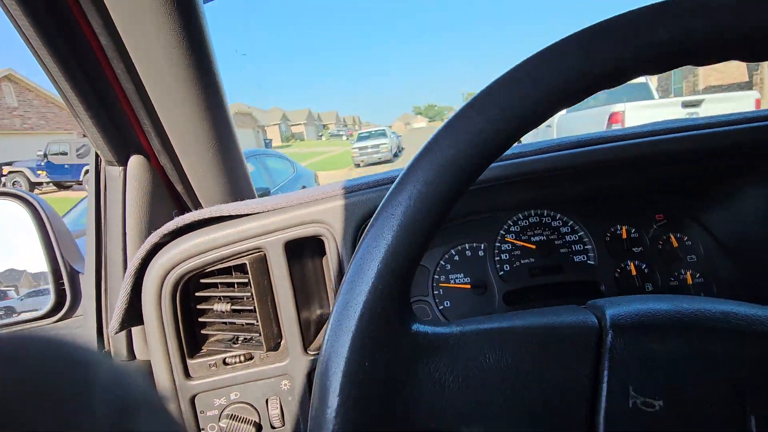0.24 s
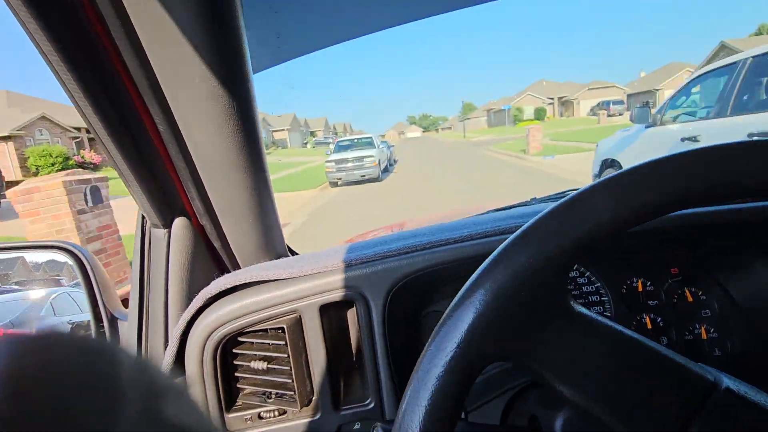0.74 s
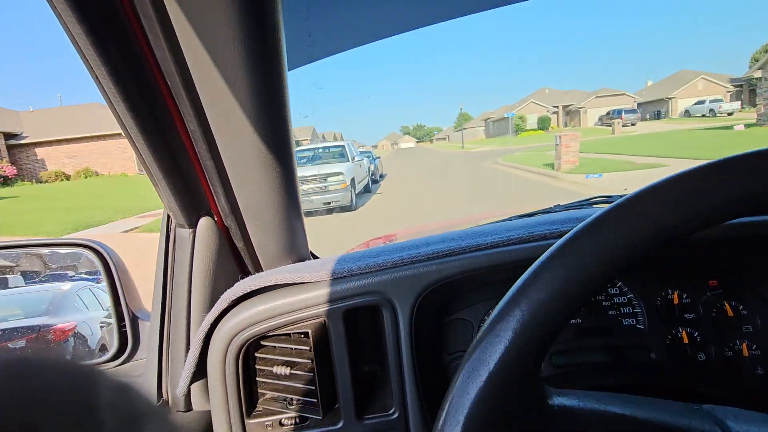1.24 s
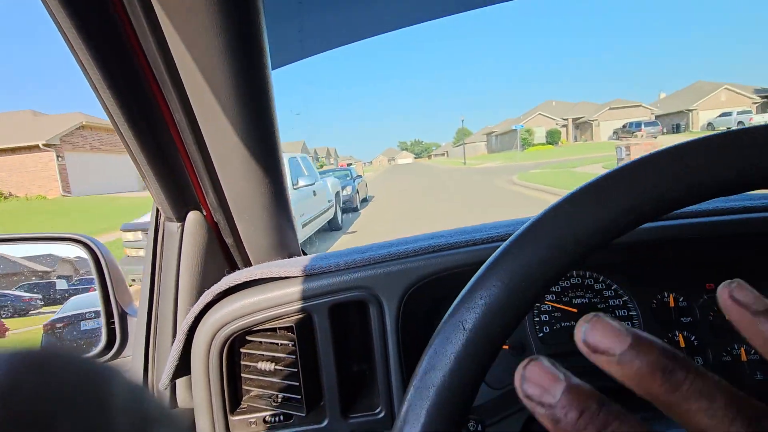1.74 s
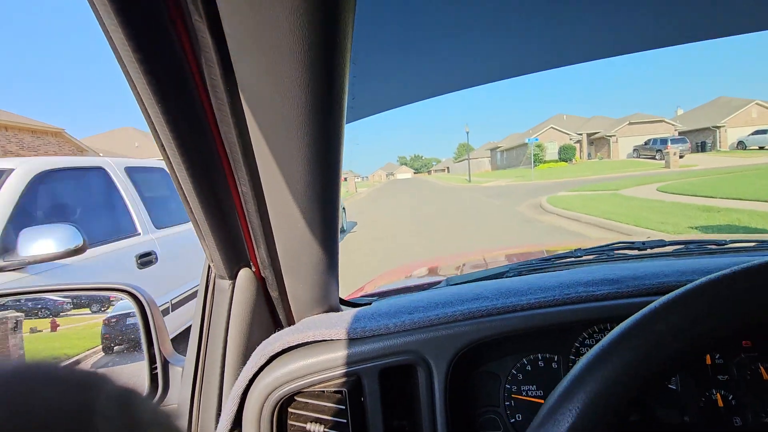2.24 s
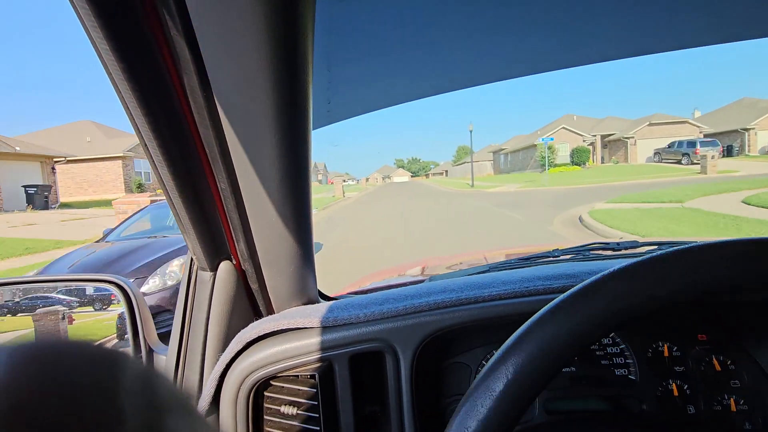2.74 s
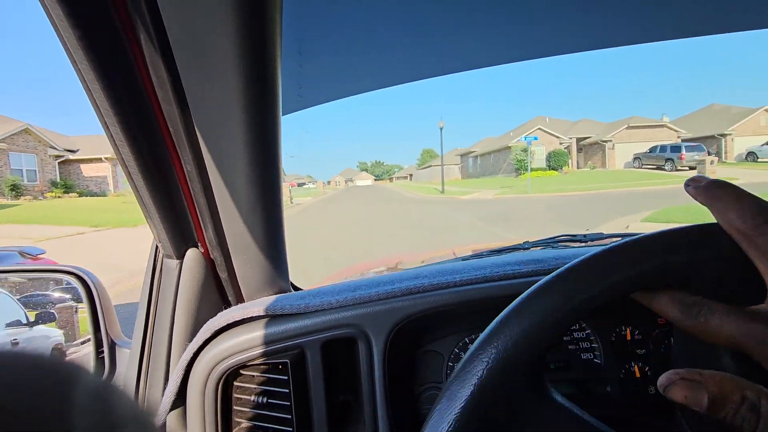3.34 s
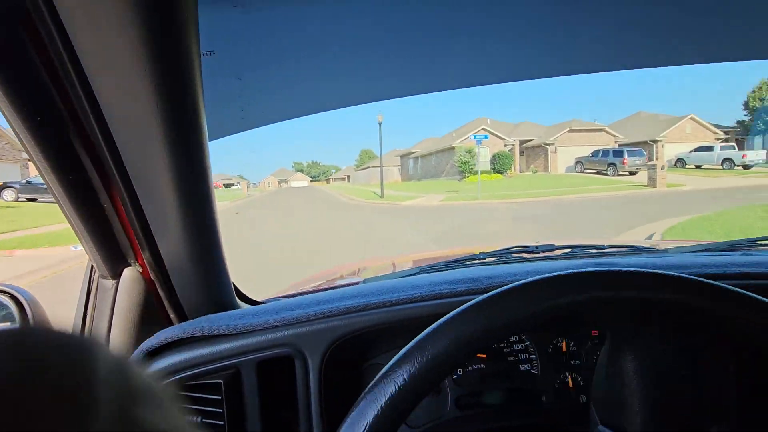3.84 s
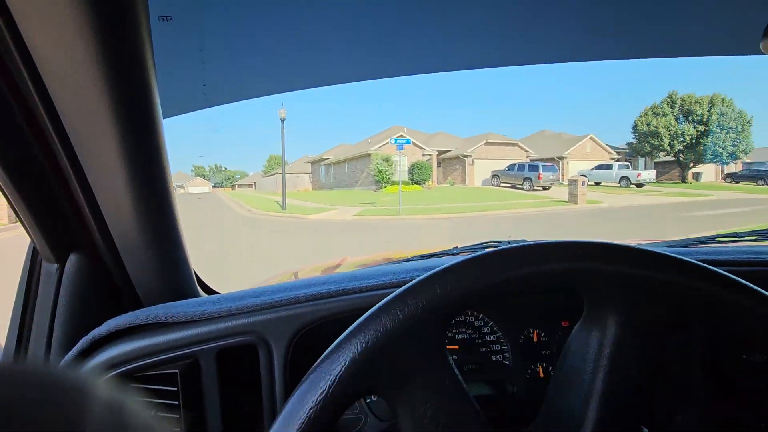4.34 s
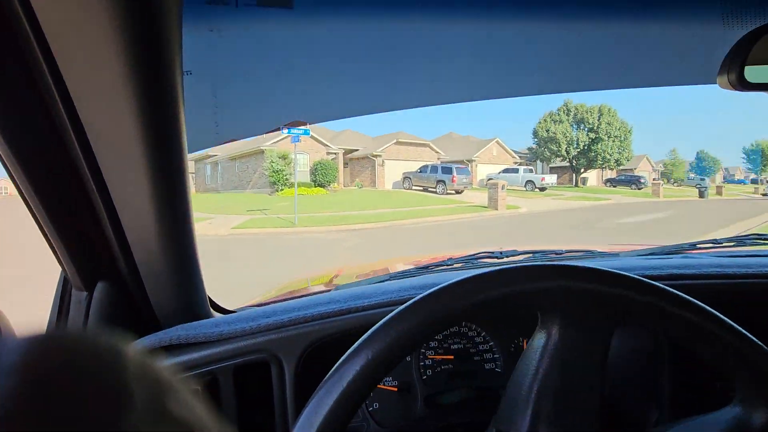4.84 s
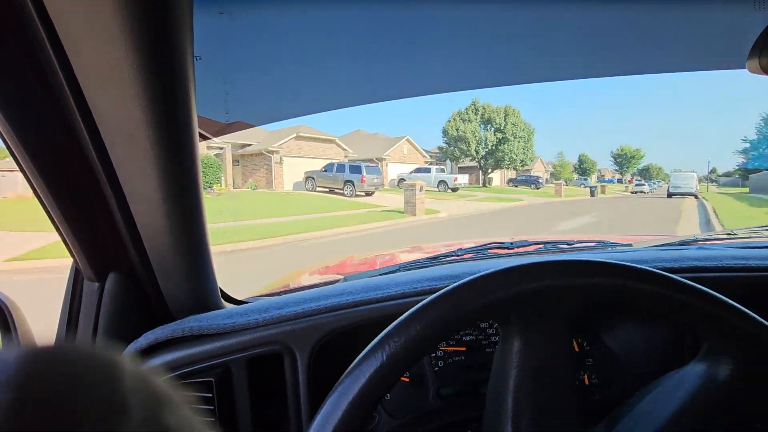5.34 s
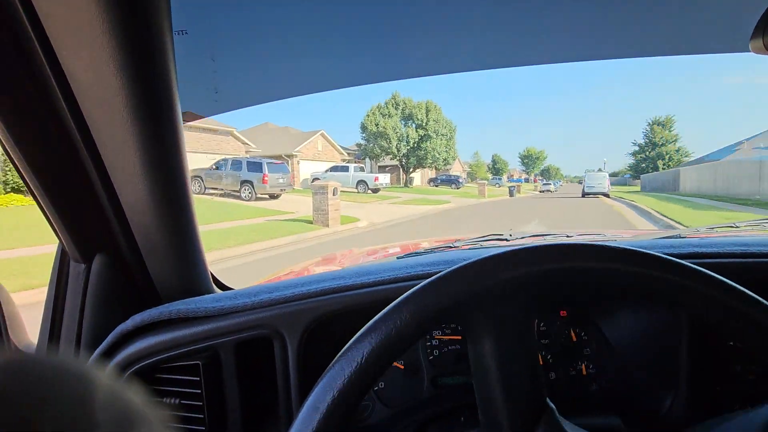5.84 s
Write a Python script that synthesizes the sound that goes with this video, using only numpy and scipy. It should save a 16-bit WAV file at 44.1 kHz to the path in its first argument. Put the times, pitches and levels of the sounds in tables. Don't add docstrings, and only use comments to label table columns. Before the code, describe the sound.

From inside a truck cab, a rough eight-cylinder engine drones and hisses past parked cars, trim rattles over bumps, then the revs climb.

```python
import sys
import numpy as np
from scipy import signal
from scipy.io import wavfile
from scipy.ndimage import uniform_filter1d

SR = 44100
rng = np.random.default_rng(int(sys.argv[2]) if len(sys.argv) > 2 else 0)


def volts_from_db(level):
    exponent = np.asarray(level, float) / 20
    return 10 ** exponent


def log_audio(samples):
    frames = np.atleast_2d(samples).T
    limited = np.clip(frames, -1, 1)
    pcm = np.round(limited * 32767).astype(np.int16)
    wavfile.write(sys.argv[1], SR, pcm)


N = 269010
T = np.arange(N) / SR

# (time [s], firings per second [Hz])
FIRING_SPEED = [(0.0, 74.07), (0.28, 75.24), (0.72, 70.56), (1.2, 76.39), (1.6, 76.86), (1.85, 74.8),
                (2.1, 77.22), (2.73, 84.55), (3.15, 79.68), (3.45, 75.13), (3.65, 77.47), (4.2, 85.56),
                (4.45, 85.01), (4.95, 86.43), (5.1, 91.12), (5.63, 115.68), (5.83, 121.11), (6.1, 120.61)]


def evened(x):
    return x / np.sqrt(np.mean(x ** 2) + 1e-20)


def read(points, hz):
    f, value = np.transpose(points)
    return np.interp(np.log(hz + 1), np.log(f + 1), value)


def over_time(rows):
    s, value = np.transpose(rows)
    return np.interp(T, s, value)


def sides(left_minus_right_db):
    return volts_from_db(np.array([[.5], [-.5]]) * left_minus_right_db)


def resonate(x, hz, width_hz):
    turn = np.exp(2j * np.pi * np.cumsum(hz * np.ones(x.shape[-1])) / SR)
    r = np.exp(-np.pi * width_hz / SR)
    smooth = signal.lfilter([1 - r], [1, -r], x / turn)
    return 2 * (turn * smooth).real


def wander(rate_hz):
    f = np.geomspace(rate_hz / 8, rate_hz, 16)[:, None]
    coarse = np.sin(2 * np.pi * (f * T[::64] + rng.random((16, 1)))).sum(0)
    return np.interp(T, T[::64], evened(coarse))


def noise_pair(colour, lead_s, patchy_db):
    # (frequency [Hz], likeness [0-1])
    likeness = [(60, 1), (130, .99), (290, .85), (640, .72), (1400, .7), (3100, .45), (6800, .25),
                (15000, .12)]
    # (frequency [Hz], left minus right [dB])
    side_lean = [(60, -3.5), (150, 7), (300, 1), (600, 3), (1000, 2), (1350, 7), (1800, 5.5), (3000, 7.5),
                 (4500, 10), (7500, 11), (9500, 5.5), (11500, -3), (13500, 26.5), (15500, -15.5)]
    frames, hz = N // 256 + 5, np.fft.rfftfreq(1024, 1 / SR)
    a, b, c, d, patches = rng.standard_normal((frames, 513, 5)).T
    patches = uniform_filter1d(patches, size=10, axis=0)
    patches = evened(uniform_filter1d(patches, size=8, axis=1))
    same = np.clip(read(likeness, hz), 0, 1)[:, None]
    late = np.exp(-2j * np.pi * hz * lead_s)[:, None]
    left, other = a + 1j * b, c + 1j * d
    right = late * same * left + np.sqrt(1 - same ** 2) * other
    lean = volts_from_db(np.array([.5, -.5])[:, None, None] * read(side_lean, hz)[:, None])
    z = np.array([left, right]) * lean * volts_from_db(read(colour, hz)[:, None] + patchy_db * patches)
    pair = signal.istft(z, nperseg=1024, noverlap=768)[1][:, :N]
    return pair / np.sqrt(np.mean(pair.mean(0) ** 2))


def cycles():
    already_turned = .045
    return already_turned + np.cumsum(over_time(FIRING_SPEED)) / 8 / SR


def drone():
    # (time [s], level [dB])
    load = [(0.0, -27), (0.36, -25), (1.1, -28), (1.4, -27), (1.62, -29.5), (1.8, -27), (3.6, -27),
            (4.98, -28), (5.2, -30), (5.4, -28.5), (5.56, -25), (5.95, -22), (6.1, -23)]
    # (order [per cycle], level [dB])
    orders = [(3, -9), (4, -17), (5, -5), (6, -18), (7, -20), (8, 0), (9, -20), (10, -14), (11, -7.5),
              (12, -21), (13, -18.5), (14, -20), (15, -22), (16, -8.5), (18, -24), (19, -20), (21, -22.5),
              (23, -24), (24, -25), (26, -24), (27, -25), (29, -25), (33, -27)]
    # (frequency [Hz], level [dB])
    pipe = [(20, -12), (48, 0), (121, 0), (126, -1), (136, 4), (143, -.5), (152, -1), (161, -4), (169, 0),
            (180, -7), (188, 2), (196, 11), (204, 7), (212, 0), (228, -7), (320, -6)]
    turns, firing_hz = cycles()[::8], over_time(FIRING_SPEED)[::8]
    out = 0
    for k, db in orders:
        size_db = db + read(pipe, k * firing_hz / 8) + .9 * wander(6.0)[::8]
        if k not in (8, 10, 13):
            size_db -= .6 * np.clip(firing_hz - 86, 0, 18)
        lag = .006 * k * wander(5.0)[::8]
        lag += .962 * k ** 2 + 4.19 * k - .96
        out = out + volts_from_db(size_db) * np.cos(2 * np.pi * k * turns - lag)
    out = volts_from_db(over_time(load)[::8] + 2.0) * out
    out = signal.resample_poly(out, 8, 1, padtype="edge")[:N]
    return out * sides(1.2)


def bumps():
    # (time [s], peak level [dB], frequency [Hz], half length [s])
    road_bumps = [(0.094, -23, 27.4, 0.17), (0.301, -14, 40.5, 0.036), (0.428, -17.5, 27, 0.074),
                  (0.572, -14.5, 32.2, 0.018), (0.716, -13.5, 27, 0.025), (0.806, -18.5, 31.6, 0.025),
                  (1.027, -24.5, 24.5, 0.1), (1.269, -18.5, 40.4, 0.014), (1.414, -27.5, 46.7, 0.045),
                  (1.495, -18.5, 33.8, 0.022), (1.687, -28.5, 29.6, 0.031), (1.95, -27.5, 27.3, 0.063),
                  (2.293, -41, 22.5, 0.077), (2.54, -41, 24.3, 0.034), (2.837, -18.5, 31.6, 0.035),
                  (2.97, -21.5, 24, 0.078), (3.209, -26, 29.5, 0.064), (3.399, -13, 34.3, 0.038),
                  (3.543, -16, 24, 0.054), (3.751, -27, 38.7, 0.093), (3.922, -19, 30, 0.052),
                  (4.017, -13.5, 28.1, 0.046), (4.277, -21.5, 24, 0.071), (4.55, -24, 26.4, 0.051),
                  (4.675, -22, 32.6, 0.059), (4.835, -14.5, 38, 0.027), (4.958, -18, 28.5, 0.03),
                  (5.171, -23, 29.4, 0.087), (5.358, -16.5, 32.5, 0.028), (5.639, -23, 27.4, 0.044)]
    swing, size = np.zeros(N), np.zeros(N)
    for (s, db, hz, half_s), turn in zip(road_bumps, rng.random(len(road_bumps))):
        near = slice(max(round((s - .4) * SR), 0), round((s + .4) * SR))
        since = T[near] - s
        shape = np.sqrt(2) * volts_from_db(db) * np.exp(-(since / half_s) ** 2 / 2)
        swing[near] += shape * np.cos(2 * np.pi * (hz * since + turn))
        size[near] += shape
    return swing, size


def boom(swing):
    # (frequency [Hz], width [Hz])
    cab_modes = [(27.5, 8), (38, 10)]
    mode_levels = [-30.5, -35.5]
    out = swing
    for db, (hz, width_hz) in zip(mode_levels, cab_modes):
        ringing = resonate(rng.standard_normal(N), hz, width_hz)
        ringing = resonate(ringing, hz, width_hz)
        out = out + volts_from_db(db) * evened(ringing)
    return np.array([out, np.roll(out, 18)])


def rumble(bump_size):
    # (frequency [Hz], level [dB])
    shake_colour = [(20, -21), (45, 10.5), (65, 0), (110, 6.5), (160, -2), (200, 2.5), (280, -1.3),
                    (320, -15), (420, -12), (540, -15), (800, -15), (1100, -20.5), (2500, -32), (6000, -47)]
    # (frequency [Hz], width [Hz], level [dB])
    panels = [
        (279, 20, -5.5),
        (550, 40, 1),
        (765, 70, -1),
    ]
    level_db = -34 + 0.34 * wander(1.7) + 2.5 * bump_size / bump_size.max()
    level_db += .8 * wander(16.0)
    level_db += 0.0521 * (over_time(FIRING_SPEED) - 80)
    shake = noise_pair(shake_colour, lead_s=0.00032, patchy_db=1.3)
    panel_sound = sum(volts_from_db(db) * resonate(shake, hz, width_hz) for hz, width_hz, db in panels)
    return volts_from_db(level_db) * (shake + panel_sound)


def street():
    # (time [s], roar level [dB], puffs level [dB], half length [s], left minus right [dB])
    parked_cars = [(0.108, -45.5, -46.5, 0.26, 6.5), (0.385, -61, -64, 0.16, 4), (0.673, -42, -43, 0.16, 8),
                   (0.83, -48, -61, 0.052, 7), (0.94, -50, -54, 0.27, 11), (1.172, -49, -52, 0.053, 8),
                   (1.295, -51.5, -65, 0.11, 6), (1.462, -56.5, -51, 0.055, 3),
                   (1.575, -55.5, -54, 0.08, 0), (2.25, -73, -50.5, 0.075, 8), (2.517, -44, -45, 0.19, 6.5),
                   (2.778, -44.5, -50, 0.31, 4), (3.14, -59, -54.5, 0.43, 9),
                   (3.484, -47, -46.5, 0.21, 6.5), (3.857, -53.5, -53, 0.2, 4), (4.17, -47, -66, 0.029, 0),
                   (4.76, -58, -64, 0.23, 5), (5.543, -65, -58, 0.61, 6.5)]
    open_roar_db, open_puffs_db, open_pan_db = -57.5, -63.5, 2
    t = T[::64]
    s, roar_db, puffs_db, half_s, pan_db = np.transpose(parked_cars)[:, :, None]
    near = 1 / (1 + ((t - s) / half_s) ** 2) ** 2
    revs_db = 0.09 * (over_time(FIRING_SPEED)[::64] - 80)
    back, spit = near * volts_from_db(2 * roar_db), near * volts_from_db(2 * puffs_db)
    clear = volts_from_db(2 * (open_puffs_db + revs_db))
    roar_power = back.sum(0) + volts_from_db(2 * (open_roar_db + revs_db))
    puffs_power = spit.sum(0) + clear
    pan = ((spit * pan_db).sum(0) + clear * open_pan_db) / puffs_power
    return [np.interp(T, t, v) for v in (10 * np.log10(roar_power), 10 * np.log10(puffs_power), pan)]


def roar():
    # (frequency [Hz], level per Hz [dB])
    wash_colour = [(180, -1), (300, -10.5), (318, -42), (341, 0), (545, -5), (836, -4), (910, -3.5),
                   (1050, -1), (1680, -9.5), (2080, -11.5), (3420, -18), (4170, -18), (9000, -30.5),
                   (11700, -24), (19800, -120)]
    # (time [s], warmth [dB])
    warmth = [(0, 2.5), (.62, 0), (.7, 3), (.8, 3), (1.4, 1), (1.9, -0.5), (3.5, -3), (4.5, -32),
              (6.1, -41)]
    # (frequency [Hz], width [Hz], level [dB])
    window_frame = [(1065, 41, -11), (1450, 39, -13), (2090, 67, -4.5), (2380, 35, -6.5)]
    turns = cycles()
    throb = 1 + 0.029 * np.cos(2 * np.pi * 8 * turns) + 0.034 * np.cos(2 * np.pi * 3 * turns)
    wash = noise_pair(wash_colour, lead_s=0.00046, patchy_db=1.0)
    warm = signal.lfilter(*signal.butter(2, [650, 1350], "band", fs=SR), wash)
    wash += (volts_from_db(over_time(warmth)) - 1) * warm
    wash += volts_from_db(3.0) * resonate(wash, 544.6, 30.0)
    wash += sum(volts_from_db(db) * resonate(wash, hz, width_hz) for hz, width_hz, db in window_frame)
    return volts_from_db(street()[0] + 3.0 + 0.24 * wander(7.7)) * throb * wash


def puffs():
    # (frequency [Hz], level per Hz [dB])
    hiss_colour = [(1470, -22), (2500, -2), (2640, -6), (3400, -8), (4150, -6), (4800, -5), (5380, -2),
                   (5990, -8), (6520, -9.5), (10300, -7), (11800, -2.5), (13700, -22), (14700, -15),
                   (15600, -11)]
    # (place in the cycle [0-1], strength [dB], fading time [s])
    leaks = [
        (.935, 0, .015),
        (.315, -1, .013),
        (.68, -6, .02),
    ]
    # (frequency [Hz], width [Hz], level [dB])
    small_parts = [(5100, 100, -26), (6460, 230, -28), (8300, 220, -35.5), (9200, 950, 2.5),
                   (11500, 59, -0.5), (12500, 390, -9)]
    _, level_db, pan_db = street()
    turns, cycle_hz = cycles(), over_time(FIRING_SPEED) / 8
    luck = rng.standard_normal((80, len(leaks), 1 + len(small_parts)))
    puff_power, part_levels = np.zeros(N), np.zeros((len(small_parts), N))
    for k, (place, db, fade_s) in enumerate(leaks):
        since_s = (turns - place + 0.034 * wander(4.3)) % 1 / cycle_hz
        draw = luck[np.floor(turns - place + .02).astype(int) + 1, k]
        puff = volts_from_db(db + 1.5 * draw[:, 0].clip(-2, 1.2))
        puff *= (1 - np.exp(-since_s / .0025)) * np.exp(-since_s / fade_s)
        puff_power += puff ** 2
        part_levels += puff * volts_from_db(3 * draw[:, 1:].T.clip(-2, 1.4)) * np.exp(-since_s / .03)
    hiss = noise_pair(hiss_colour, lead_s=0.000303, patchy_db=2.5)
    shake = rng.standard_normal(N)
    rung = 0
    for (hz, width_hz, db), part_level in zip(small_parts, part_levels):
        rung = rung + volts_from_db(db) * evened(resonate(shake, hz, width_hz)) * part_level
    steady_power = 0.083 * (cycle_hz / 9.07) ** 3
    out = hiss * np.sqrt(steady_power + puff_power)
    out += volts_from_db(-8.0) * rung * np.array([[1.3], [.4]])
    side = volts_from_db(np.array([[.3], [-.7]]) * (pan_db - 3.0))
    return volts_from_db(level_db + 5.0) * side * out


def short_rings(events, rise_s, fade_s, width_hz, pan_db, clean):
    out, t = np.zeros(N + 6000), np.arange(6000) / SR
    shape = (1 - np.exp(-t / rise_s)) * np.exp(-t / fade_s)
    for s, db, hz in events:
        rough = resonate(rng.standard_normal(6000), hz, width_hz)
        rough = evened(resonate(rough, hz, 3 * width_hz))
        tone = np.sin(2 * np.pi * hz * t)
        ring = ((1 - clean) * rough + clean * tone) * shape
        out[round(s * SR):][:6000] += volts_from_db(db) * ring / abs(ring).max()
    return out[:N] * sides(pan_db)


def chirps():
    # (time [s], peak level [dB], frequency [Hz])
    belt_slips = [(0.0295, -52, 5250), (0.0752, -44, 5300), (0.1745, -43, 5300), (0.385, -49, 5300),
                  (0.4, -55, 5380), (0.833, -50, 5100), (2.21, -48, 5170), (2.606, -45, 5320),
                  (2.7621, -52, 5250), (2.7621, -50, 6800), (3.782, -58, 5600), (2.915, -62, 10100)]
    return volts_from_db(-1.5) * short_rings(belt_slips, rise_s=.004, fade_s=.013, width_hz=90.0, pan_db=9.0, clean=.6)


def squeaks():
    # (time [s], peak level [dB], frequency [Hz])
    rubs = [(0.097, -39, 8540), (0.1361, -42.5, 11100), (0.5233, -37.5, 6500), (0.6094, -41, 8200),
            (0.635, -47, 7340), (0.6777, -35, 8200), (0.7465, -44, 6150), (0.9087, -44.5, 11000),
            (1.1303, -49.5, 8200), (2.4334, -41, 7300), (2.7644, -52, 11000), (2.8554, -56, 11600),
            (3.4225, -41, 9040)]
    return volts_from_db(-2) * short_rings(rubs, rise_s=.002, fade_s=.009, width_hz=200.0, pan_db=9.0, clean=.3)


def knocks():
    # (time [s], peak level [dB], frequency [Hz])
    body_hits = [(0.143, -37, 540), (0.246, -31, 510), (0.37, -32, 558), (0.505, -36, 540),
                 (0.566, -33, 508), (0.566, -38, 806), (0.566, -32, 666), (0.615, -30.5, 504),
                 (0.666, -39, 525), (0.715, -33, 550), (0.784, -33, 560), (0.836, -34, 500),
                 (0.9, -37, 540), (1.17, -33, 500), (1.25, -33, 505), (1.32, -37, 540), (1.55, -37, 550),
                 (2.285, -37, 586), (2.694, -31, 540), (3.11, -33, 540), (3.365, -31, 477),
                 (3.406, -35, 486), (3.405, -29.5, 778), (3.446, -34, 480), (3.478, -32, 508),
                 (3.727, -41, 550), (3.766, -33, 362), (3.766, -38, 540), (3.824, -30, 490),
                 (3.849, -35, 450), (3.891, -33, 503), (3.893, -38, 1050), (3.929, -38, 540),
                 (3.993, -30.5, 490), (4.022, -31, 535), (4.073, -32, 756), (4.125, -50, 1036),
                 (4.157, -36, 796), (4.33, -44, 485), (4.365, -40, 540), (4.56, -35, 330),
                 (4.729, -30.5, 319), (4.865, -42, 317), (5.197, -31, 374)]
    return volts_from_db(-1.5) * short_rings(body_hits, rise_s=0.0045, fade_s=0.012, width_hz=90.0, pan_db=1.1, clean=.5)


def thuds():
    # (time [s], peak level [dB], frequency [Hz])
    seat_blows = [(.27, -30, 114), (3.8, -33, 285), (3.84, -37, 290), (4.14, -33, 260), (2.86, -34, 165),
                  (5.98, -38, 290), (4.69, -31, 255), (4.56, -37, 270), (5.11, -35, 265), (5.08, -34, 150),
                  (5.18, -29, 160), (5.19, -35, 285), (5.38, -37, 280), (.6, -31, 90)]
    rise_turns, fade_turns = 4, 7
    out, t = np.zeros(N + 12000), np.arange(12000) / SR
    for (s, db, hz), turn in zip(seat_blows, rng.random(len(seat_blows))):
        shape = (1 - np.exp(-t * hz / rise_turns)) * np.exp(-t * hz / fade_turns)
        tone = np.sin(2 * np.pi * (hz * t + turn))
        out[round(s * SR):][:12000] += volts_from_db(db) * shape / shape.max() * tone
    return out[:N] * sides(3.0)


def ticks():
    # (time [s], peak level [dB], frequency [Hz])
    contacts = [(4.013, -40, 4730), (4.013, -40, 4100), (4.026, -48, 2200), (4.014, -38, 2160),
                (4.074, -38, 6250), (4.075, -38.5, 3300), (4.134, -48, 4540), (4.156, -46, 7840),
                (4.17, -43, 3540), (4.178, -50, 4450), (4.2, -48, 4000), (4.2, -49, 6240),
                (4.284, -44.5, 6280), (4.284, -49, 8100), (4.284, -37, 2080), (4.284, -41, 4010),
                (4.284, -54, 11100), (4.074, -47, 10500), (4.155, -48.5, 11500), (3.5054, -46, 1970),
                (3.5687, -40, 2370), (3.894, -41, 2480), (3.897, -50, 7000), (3.94, -50, 5530),
                (3.883, -52, 8100), (3.98, -51, 7800), (1.25, -46, 2550)]
    return short_rings(contacts, rise_s=.001, fade_s=.0045, width_hz=280.0, pan_db=4.0, clean=.6)


def rattles():
    # (time [s], peak level [dB], brightness [dB], length [s], left minus right [dB])
    blows = [(3.404, -24, -38, 0.0087, -2), (3.449, -32, -36, 0.013, -7), (3.483, -34, -21, 0.0096, 5),
             (3.504, -32.5, -6, 0.0086, -1), (3.827, -30.5, -24, 0.021, -1),
             (3.89, -29.5, -38, 0.014, -16.5), (4.021, -25.5, -36, 0.0058, -7),
             (4.073, -17, -21, 0.01, 5.5), (4.121, -21.5, -32, 0.014, 3.5), (4.14, -45, -21, 0.013, -8),
             (4.153, -23, -21, 0.008, 11), (4.159, -23, -23, 0.01, -3), (4.202, -41, -9, 0.0099, -5),
             (4.255, -25.5, -30, 0.0097, 0), (4.514, -43, -2, 0.0071, 8), (4.756, -44.5, 14, 0.0074, 4)]
    # (frequency [Hz], width [Hz], level [dB])
    trim_modes = [(508, 56, -2), (540, 42, 4), (690, 130, -1), (1014, 58, -9), (1652, 120, -5),
                  (2065, 130, -5.5), (2800, 730, -10.5), (4600, 400, -55)]
    out, t = np.zeros((2, N + 6000)), np.arange(6000) / SR
    for s, db, bright_db, length_s, pan_db in blows:
        burst = rng.standard_normal((3, 6000)) * np.exp(-t / length_s) * (1 - np.exp(-t / 0.0013))
        burst = burst[0] + .7 * burst[1:]
        burst = burst * (1 + 1.2 * np.exp(-t / .003))
        tilt_db = (bright_db + 24.5) / np.log2(4600 / 500)
        body = 0
        for hz, width_hz, mode_db in trim_modes:
            gain = volts_from_db(mode_db + tilt_db * np.log2(hz / 500)) / np.sqrt(width_hz)
            body = body + gain * resonate(burst, hz, width_hz)
        treble_limit_hz = np.clip(13000 + 250 * bright_db, 2500, 12000)
        body = signal.lfilter(*signal.butter(3, treble_limit_hz, fs=SR), body)
        crack_hz = 3300 + 60 * max(-32 - db, 0)
        crack = resonate(resonate(burst, crack_hz, 1800.0), crack_hz, 3000.0) * np.exp(-t / 0.008)
        sound = body / abs(body).max() + volts_from_db(bright_db - 12.0) * crack / abs(crack).max()
        out[:, round(s * SR):][:, :6000] += volts_from_db(db) * sides(pan_db) * sound
    return out[:, :N]


def snaps():
    # (time [s], peak level [dB], frequency [Hz])
    hard_hits = [(3.826, -43, 3000), (3.896, -39, 5000), (4.014, -40, 7000), (4.026, -34, 2500),
                 (4.073, -43, 9000), (4.137, -44, 8000), (4.154, -42, 10000), (4.172, -42, 3500),
                 (4.284, -38, 4500), (4.285, -46, 10000), (3.405, -40, 1810)]
    return short_rings(hard_hits, rise_s=.0005, fade_s=.005, width_hz=3500.0, pan_db=4.0, clean=0)


def hums():
    # (time [s], peak level [dB], frequency [Hz])
    panel_tones = [(5.49, -58, 810), (4.665, -45.5, 760), (4.68, -48, 700), (6.05, -46, 555),
                   (5.86, -52, 860), (5.78, -43, 610), (6.04, -47, 460), (5.75, -37, 290), (5.87, -44, 620),
                   (5.72, -53, 350), (5.9, -63, 880), (5.45, -56, 670)]
    return short_rings(panel_tones, rise_s=.015, fade_s=.05, width_hz=14.0, pan_db=1.5, clean=.6)


def scene():
    swing, bump_size = bumps()
    engine = drone() + puffs() + chirps() + squeaks()
    road = boom(swing) + rumble(bump_size) + roar()
    body = knocks() + thuds() + hums()
    loose_trim = rattles() + ticks() + snaps()
    return engine + road + body + loose_trim


def band_limit(x):
    return signal.sosfilt(signal.butter(12, 15850, fs=SR, output="sos"), x)


def record(dry):
    x = signal.sosfilt(signal.butter(2, 17.0, "high", fs=SR, output="sos"), dry)
    x = signal.sosfilt(signal.ellip(12, .5, 55, 15735, fs=SR, output="sos"), x)
    return band_limit(x)


dry = scene()
out = record(dry)
log_audio(out)
```